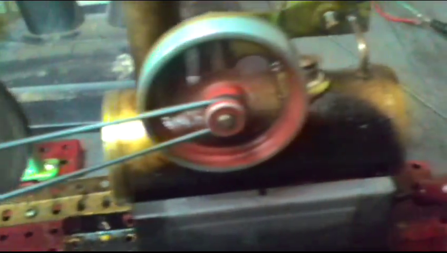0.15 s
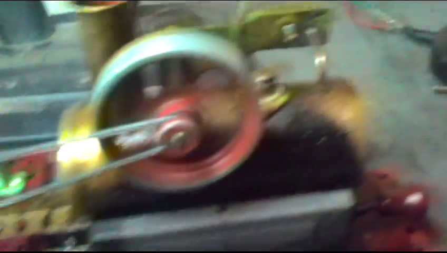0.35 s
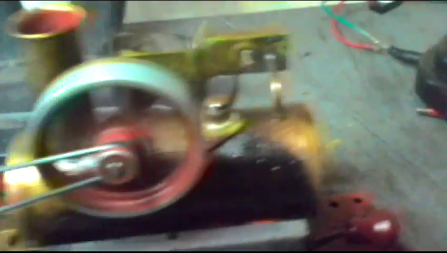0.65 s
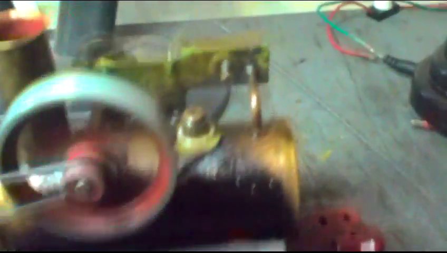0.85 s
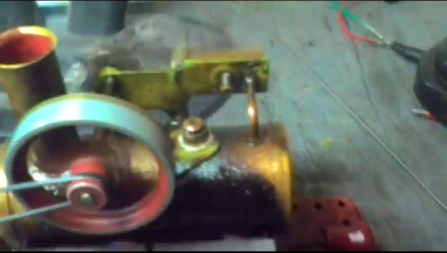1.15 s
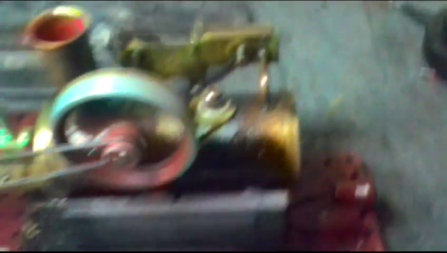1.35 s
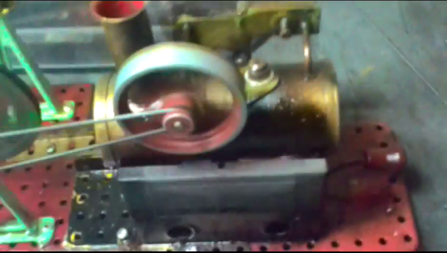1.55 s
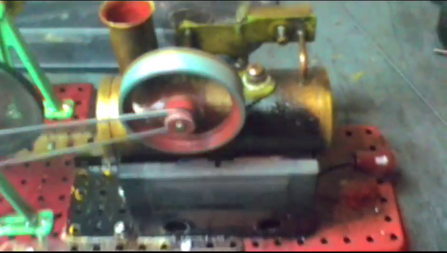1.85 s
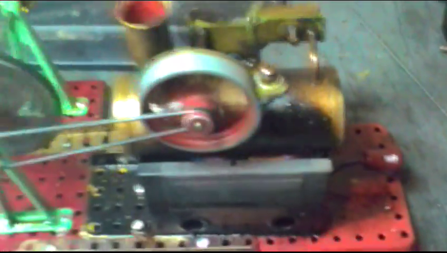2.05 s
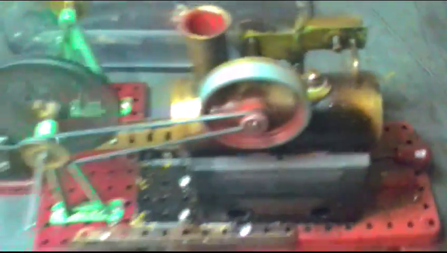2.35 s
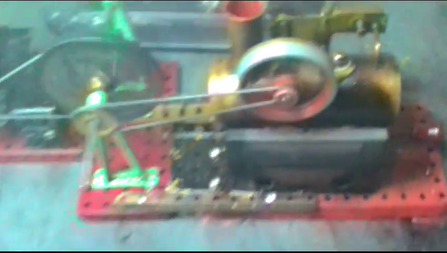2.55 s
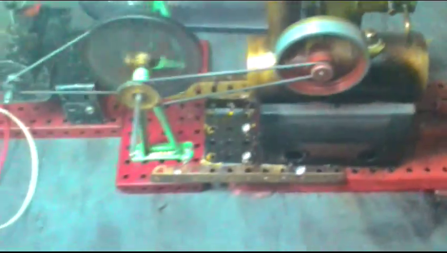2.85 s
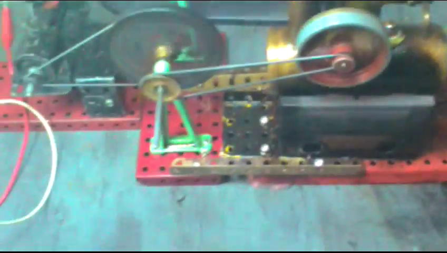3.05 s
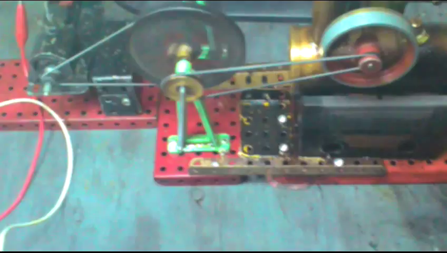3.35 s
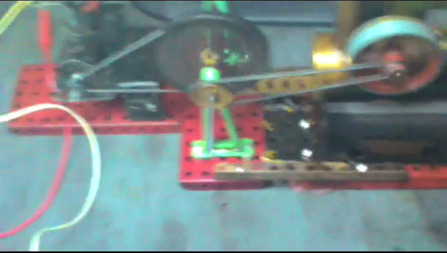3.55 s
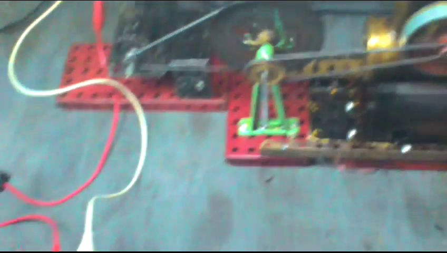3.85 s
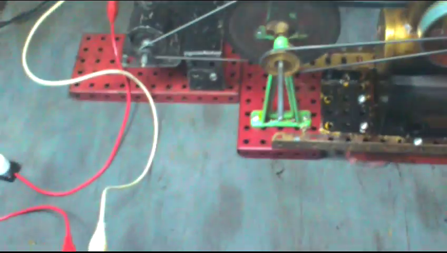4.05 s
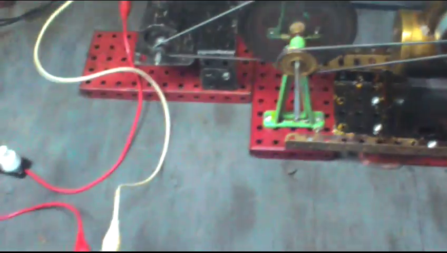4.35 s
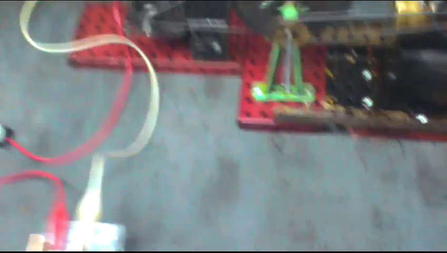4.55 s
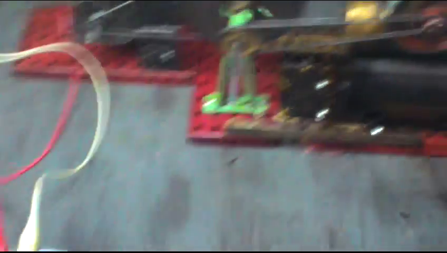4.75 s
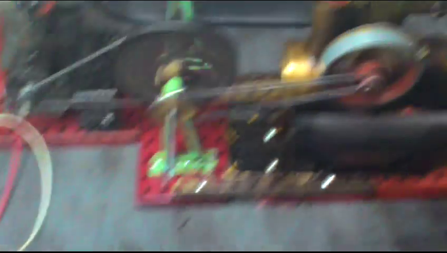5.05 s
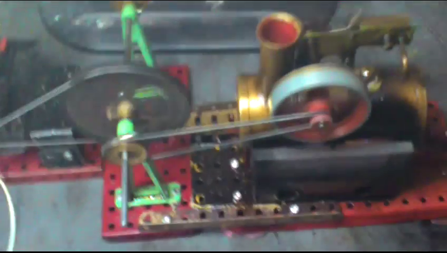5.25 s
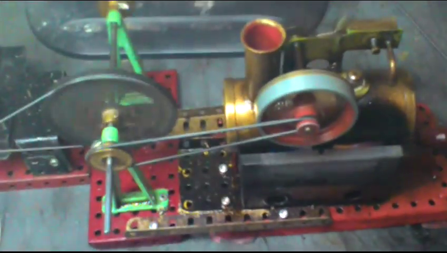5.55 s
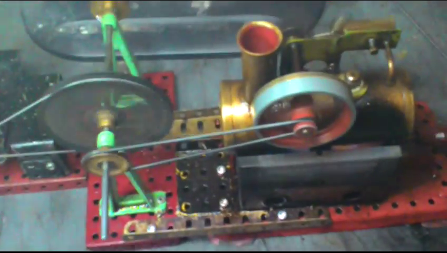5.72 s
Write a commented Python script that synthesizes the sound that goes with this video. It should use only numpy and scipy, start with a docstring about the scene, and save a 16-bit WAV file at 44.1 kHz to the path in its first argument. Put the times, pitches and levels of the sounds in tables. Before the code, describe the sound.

A small model steam engine runs for about six seconds at a steady speed, its loose crank knocking roughly 26 times a second. The knocks merge into a bright, ringing clatter of brass and steel over a low hum from the base plate, with soft belt and bearing rub between them. A thin, high valve spit is strongest in the first half second, and brief wet sputters of steam come between about 0.4 and 1.6 seconds. A loose metal strip rattles lightly around 1 second and again around 4.2 seconds. The clatter swells a little about every three quarters of a second as the load rises. The close microphone moves from the boiler and flywheel past the driven shaft, then farther back, shifting the ringing tones. The clatter eases from about 1.5 seconds and strengthens again after 5. Short echoes and faint workshop room noise sit behind it.

```python
"""A model steam engine runs on a bench, and its loose crank knocks once a turn, about 26 times a second.
Each knock makes the brass parts clatter and the steel frame ring, and its low thump keeps the base
plate humming. The valve spits and wet steam sputters. The engine is belted to a line shaft, and belts
and bearings rub between the knocks. The workshop murmurs and echoes behind it all as the microphone
moves from the boiler and flywheel to the shaft, over the base and farther back."""
import sys
import numpy as np
from scipy import signal
from scipy.fft import rfft, irfft, next_fast_len
from scipy.io import wavfile
from scipy.ndimage import uniform_filter1d

SR = 44100
rng = np.random.default_rng(int(sys.argv[2]) if len(sys.argv) > 2 else 0)


def to_wav(sig):
    """Store sig (one row per channel, or 1-D mono) as 16-bit WAV at the path in sys.argv[1].

    Samples outside -1..1 are clipped; the rate is SR.
    """
    pcm = np.clip(np.atleast_2d(sig), -1, 1) * 32767
    pcm = np.round(pcm).astype(np.int16)
    wavfile.write(sys.argv[1], SR, pcm.T)  # frames by channels


N = 259352
TIME = np.arange(N) / SR

# Microphone path: time_s, place (0 boiler, 1 flywheel, 2 line shaft, 3 over the base, 4 farther back)
MIC_PATH = [(0, 1), (.45, 0.5), (.95, 1), (1.25, 1), (1.8, 1.5), (2.25, 2), (3.0, 3.5), (4.6, 3), (5.3, 4),
            (5.88, 4)]
# Echo off the boiler casing: time_s, delay_s
BOILER_ECHO = [(0, 0.0026), (.55, 0.0017), (1.15, 0.002), (1.5, 0.0026), (1.9, 0.0013), (2.2, 0.0022),
               (2.6, 0.0019), (3.3, 0.0021), (3.95, .00317), (5.0, 0.0028), (5.4, 0.0023), (5.88, 0.0018)]
# Echo off the bench: delay_at_boiler_s, delay_farther_back_s, gain_db
BENCH_ECHO = (.0058, .0066, -13)

# Tone colour of the background, the wall echoes and the wet steam: pitch_hz, gain_db
MURMUR_COLOUR = [(20, -3), (45, 1.5), (100, -20), (300, -3), (700, 1.5), (1900, -1.5), (2500, -21),
                 (3300, 0), (8000, -41), (16000, -78)]
WALL_COLOUR = [(300, -35), (1200, -5.5), (2050, -2), (2450, -24.5), (2850, 4.5), (3700, -2.5), (4700, -1),
               (5400, -0.5), (5900, 7), (6900, -10.5), (7600, -8.5), (8700, -44), (16000, -69)]
SPUTTER_COLOUR = [(200, -60), (900, -16), (1950, -4), (2450, -4), (3100, -1.5), (3800, -7), (4500, 0),
                  (5200, -9), (6200, 2), (7800, -5.5), (9500, -24), (16000, -59)]
# Splashes of wet steam from the cylinder: middle_s, half_length_s, level_db
SPLASHES = [(0.42, 0.042, -48.5), (0.726, 0.015, -53), (1.196, 0.048, -53), (1.565, 0.038, -51)]
# Spells when a loose strip rattles: middle_s, length_s, delay_in_turn_s, pitch_hz, level_db
RATTLES = [(1.046, 0.63, 0.00292, 2040, -49.5), (4.212, 0.77, .0115, 1784, -54)]

# Loudness of each part as the microphone passes, before swells and surges: time_s, level_db
WALL_LEVEL = [(0, -51.5), (1.4, -54), (2.6, -47), (3.1, -52), (4.6, -49.5), (5.2, -44.5), (5.88, -45)]
VALVE_LEVEL = [(0, -48.5), (.4, -44), (1.198, -55), (2.098, -57), (3.197, -53), (4.5, -52.5),
               (4.997, -49.5), (5.88, -51.5)]
BASE_LEVEL = [(0, -45), (2.8, -46.5), (4.9, -44), (5.88, -44)]
FRAME_LEVEL = [(0.0, -44), (.45, -45.5), (1.15, -46), (1.4, -49.5), (2.2, -54), (3.18, -57.5), (4.08, -52),
               (4.6, -54.5), (5.0, -52), (5.45, -54), (5.88, -52)]
BRASS_LEVEL = [(0, -34.5), (.45, -34.5), (1.5, -40), (2.1, -39), (2.7, -39), (3.05, -40.5), (4.7, -41),
               (5.1, -36), (5.88, -34)]
# Swell of the base plate's upper tones as the microphone passes: time_s, gain_db
UPPER_HUM = [(0, -7), (2.3, 4.5), (2.75, -1), (3.1, -4), (3.5, -2), (4.2, 0.5), (4.95, 1.5), (5.3, 1.5),
             (5.88, 1)]

# The tones each part rings at (wider ones die sooner) and their relative strength at each place:
# pitch_hz, width_hz, boiler_db, flywheel_db, shaft_db, over_base_db
VALVE_TONES = [(7276, 192, 20.5, 7.5, 0, -0.5), (8080, 400, 11.5, 1, 4, -0.5),
               (8120, 730, -12, -3, 0, -3.5), (10150, 130, 0, -5, -6.5, -17.5),
               (10940, 420, -20, -21, -14, -15.5)]
BASE_TONES = [(92, 22, -19.5, -15.5, -12.5, -18.5), (160.6, 23.2, -10.5, -7.0, -3.5, -10),
              (181.5, 21.0, -15, -7, -4, -10), (236.73, 6.65, 5.5, 7.5, 9, 3.5),
              (285.6, 37.3, -12, -3.5, 0, -6), (332.8, 25.5, -3.5, -2.5, -2, -6),
              (429.0, 15.3, -4, -14.5, -14, -9.5), (462.7, 19.8, -3, -35, -20, -7.0),
              (529, 31.0, -1, -8, -16, -75), (639.3, 31, 7, -8.5, -11.5, -22),
              (676.6, 28.6, 3, -2.5, -18, -15)]
# The same columns, then farther_back_db
FRAME_TONES = [(806, 195, -1, -6, -5, -23.5, -10.5), (1044, 46, -11, -38, -44, -10.0, -8),
               (1409, 67, -6, -4.5, 1.5, -13.5, -8), (1447, 170, -6.5, -4.5, -3, -10.5, -23),
               (1661, 59, -15, 2.5, -7, -47, -10.5), (1745, 29, -6, -11, 2, -14, -21),
               (1835, 90, -4, 4.5, 1, -17, -14), (2067, 110, 1, 0.5, 5, -13, -3)]
BRASS_TONES = [(2980, 110, -23, -8, -40, -29, -11), (3534, 84, -3.5, -44, -31, -21.5, -10.5),
               (3967, 113, -24, -36, -11.5, -5.5, -7.5), (4200, 52, -27, -14, -3.5, -36.0, -8.5),
               (4306, 29, -20, -20, -9, -33, -28), (4564, 68, -2, -10, -13, -17.5, -5.0),
               (4695, 53, -15, -46, -8.5, -9.5, 0), (4904, 220, -36.0, -42, -8, -0.5, 4),
               (5100, 170, -43, -27, -4.5, -1.5, -1), (5565, 150, -8, -22, -36.0, -36.0, -12),
               (5833, 117, 0.0, 1.5, 2.5, -3.5, -7), (5920, 230, -14, -3.5, -7, -55, -30),
               (6360, 270, -7, 1.5, -10, -23, -7), (6660, 170, 3, -36.0, -44, -50, -10)]
# Single tones that shift as the microphone passes: time_s, pitch_hz, level_db
LOW_PLATE_RING = [(0, 660, -57), (.5, 642, -54.5), (1.0, 654, -56), (1.6, 660, -59), (2.299, 657, -64),
                  (4.6, 667, -69.5), (5.2, 660, -63), (5.88, 675, -62)]
STRIP_RING = [(0, 1080, -65.5), (.5, 1093, -58.5), (0.849, 1104, -54.5), (1.5, 1112, -58.5),
              (2.0, 1142, -56), (2.6, 1136, -57.5), (3.002, 1110, -60), (5.88, 1240, -66)]
BRACKET_RING = [(0, 1160, -67), (1.7, 1230, -66), (2.6, 1196, -59), (3.05, 1233, -62.5), (3.45, 1200, -54),
                (3.75, 1235, -60.5), (4.15, 1237, -50), (4.6, 1240, -56.5), (4.95, 1207, -48),
                (5.3, 1265, -55), (5.7, 1257, -52), (5.88, 1230, -51)]
LOW_BRASS_RING = [(0, 3020, -39.5), (.55, 3080, -47.5), (0.799, 3335, -46), (1.2, 3490, -51.5),
                  (1.55, 3390, -55.5), (2.1, 3480, -47), (2.35, 2970, -63), (2.6, 2960, -47),
                  (2.85, 2900, -54.5), (3.1, 2720, -82), (4.7, 3086, -54), (5.05, 2981, -48),
                  (5.88, 2940, -52)]

# Short bursts of force within one turn: delay_s, gain_db, decay_s, scatter_db
VALVE_TICKS = [(.0018, 10.2, 0.0053, 0.98), (0.0174, 5.1, 0.0031, 5.2)]
FRAME_JOLTS = [(0.002, 7.5, 0.0022, 0.41), (.0055, 2.5, 0.0021, 1.4), (0.0098, 8.5, 0.00086, 1.1),
               (0.023, 3, 0.0016, 2.3), (0.035, -5.5, 0.0021, 2.2)]
CRANK_CHATTER = [(.0016, -1, .0008, 4.5), (.0033, -3.5, 0.00086, 4), (.0065, -17, 0.0014, 2.5),
                 (0.0100, -8.5, 0.0008, 3), (0.0196, -18.5, 0.002, -1.5)]
# Engine speed, kept nearly even by the flywheel: time_s, turns_per_s
SPEED = [(0, 26.68), (1.3, 26.51), (4.7, 26.53), (5.88, 26.75)]
# The load rises about once per turn of the big driven wheel: start_s, boost_db
LOAD_SURGES = [(0.31, 1.5), (1.091, 3), (1.801, 5), (2.53, 2), (3.32, 6), (3.999, 6.5), (4.78, 6),
               (5.581, 1)]
# Single knocks that land harder or softer than their neighbours: time_s, gain_db
ODD_KNOCKS = [(1.656, 3.5), (2.033, -0.5), (2.146, 2.5), (2.183, -3.5), (2.712, 1.5), (2.976, -2.5),
              (3.089, 0.5), (3.239, 2.5), (3.353, 3.5), (3.843, -2.5), (3.956, -2.0), (3.993, -1),
              (4.144, -3.5), (4.22, 2.5), (4.37, 0.5), (4.521, -3.0), (4.559, 2), (4.597, 3), (4.672, -2),
              (4.71, -2), (4.747, -1.5), (4.785, 3.5)]
# Hard rebounds of the crank pin: time_s, gain_db (added to rebound_db)
REBOUNDS = [(0.384, -5.5), (0.4215, -8), (0.574, -11), (1.135, -10), (1.816, -7.5), (1.9305, -14),
            (2.12, -29)]


def from_db(db):
    """Turns decibels into a number to multiply by."""
    return 10 ** (np.asarray(db) / 20)


def in_time(rows):
    """Joins a table's points with straight lines, giving each column a value at every sample."""
    time_s, *columns = np.transpose(rows)
    return [np.interp(TIME, time_s, column) for column in columns]


def keep_band(x, hz, kind, order=2):
    """Keeps the "low" or the "high" side of hz; a higher order cuts more steeply."""
    return signal.sosfilt(signal.butter(order, hz, kind, fs=SR, output="sos"), x)


def at_level(x, db, block=128, span=39):
    """Brings the level, averaged over a few turns, to db."""
    power = np.add.reduceat(x * x, np.arange(0, N, block)) / block
    power = uniform_filter1d(uniform_filter1d(power, span), span)
    return from_db(db) * x * np.repeat((np.abs(power) + 1e-20) ** -.5, block)[:N]


def coloured(x, colour):
    """Turns each frequency up or down to follow a tone colour table."""
    hz, db = np.transpose(colour)
    size = next_fast_len(N)
    bins_hz = np.maximum(np.fft.rfftfreq(size, 1 / SR), 1)
    gain = from_db(np.interp(np.log(bins_hz), np.log(hz), db))
    return irfft(rfft(x, size) * gain, size)[..., :N]


def clicks(times, gains):
    """Clean, hard blows, one sample long."""
    out = np.zeros(N)
    out[np.clip(np.asarray(times) * SR, 0, N - 1).astype(int)] = gains
    return out


def contacts(starts, table, rub_db, alike, rise_s=0.00041):
    """Noisy bursts over steady rubbing. The same surfaces meet each turn, so the share `alike` repeats."""
    size = int(.04 * SR)
    age = np.arange(size) / SR
    power = np.full((len(starts), size), from_db(rub_db) ** 2)
    for delay, db, decay, scatter_db in table:
        force = from_db(db + scatter_db * rng.standard_normal((len(starts), 1)))
        burst = np.exp(-np.abs(age - delay) / np.where(age < delay, rise_s, decay))
        power += (force * burst) ** 2
    shape, usual_shape = np.sqrt(power), np.sqrt(power.mean(0))
    grain = rng.standard_normal(size)
    for _ in range(8):   # a hard contact holds all frequencies evenly
        spectrum = rfft(grain * usual_shape)
        grain = irfft(spectrum / np.abs(spectrum), size) / usual_shape
        grain = np.clip(grain / grain.std(), -3, 3)
    blows = shape * (np.sqrt(alike) * grain + np.sqrt(1 - alike) * rng.standard_normal(shape.shape))
    out = np.zeros(N + 2 * size)
    for start, blow in zip(np.clip(starts * SR, 0, N).astype(int), blows):
        out[start:start + size] += blow
    return out[:N]


def resonate(force, tones):
    """A part rings at steady pitches, each as strong as it is at the microphone's place."""
    place, = in_time(MIC_PATH)
    out = np.zeros(N)
    for k, (hz, width, *dbs) in enumerate(tones):
        gain = np.interp(place, np.arange(len(dbs)), from_db(dbs))
        out += (-1) ** k * gain * signal.lfilter(*signal.iirpeak(hz, hz / width, fs=SR), force)
    return out


def ring(force, hz, width_hz, edge_ratio=2.49):
    """One gliding tone: shift the force down by hz, smooth it, and shift it back up."""
    angle = 2 * np.pi * np.cumsum(hz) / SR
    waves = np.array([np.cos(angle), np.sin(angle)])
    core, edge = np.exp(-np.pi * width_hz / SR), np.exp(-np.pi * edge_ratio * width_hz / SR)
    slow = signal.lfilter([(1 - core) * (1 - edge)], [1, -core - edge, core * edge], force * waves)
    return slow[0] * waves[0] + slow[1] * waves[1]


def struck(force, tones, waver_db=2.1, pitch_waver=0.0055):
    """A struck part's tones waver a little and change in strength with the microphone's place."""
    moments = np.arange(0, TIME[-1] + 1, .12)
    place = np.interp(moments, *np.transpose(MIC_PATH))
    out = np.zeros(N)
    for k, (hz, width, *dbs) in enumerate(tones):
        louder, higher = rng.standard_normal((2, len(moments)))
        gain = np.interp(place, np.arange(len(dbs)), from_db(dbs)) * from_db(waver_db * louder)
        pitch_hz = np.interp(TIME, moments, hz * (1 + pitch_waver * higher))
        out += (-1) ** k * np.interp(TIME, moments, gain) * at_level(ring(force, pitch_hz, width), 0)
    return out


def single_tone(force, curve, width_hz):
    """A single tone whose pitch and level shift as the microphone passes."""
    hz, db = in_time(curve)
    return at_level(ring(force, hz, width_hz), db)


def murmur(level_db=-59.5, side_db=-17):
    """The steady background of the workshop, nearly alike on both sides."""
    middle, side = coloured(rng.standard_normal((2, N)), MURMUR_COLOUR)
    return from_db(level_db) * (middle + from_db(side_db) * side * [[1], [-1]]) / middle.std()


def wall_echoes(force, surge_db, first_wall_s=0.0061, fade_s=0.14, surge_share=0.12):
    """The walls return the clatter and fill the gaps between the knocks."""
    age = np.arange(SR // 2) / SR
    tail = rng.standard_normal(len(age)) * from_db(-60 * age / fade_s) * (age > first_wall_s)
    echoes = coloured(signal.fftconvolve(force, tail)[:N], WALL_COLOUR)
    return at_level(echoes, in_time(WALL_LEVEL)[0] + surge_share * surge_db)


def room_scatter(x, fade_s=0.0054, gain_db=-10.5):
    """The room scatters the treble into a very short tail, different at each ear."""
    age = np.arange(SR // 3) / SR
    tail = rng.standard_normal((2, len(age))) * from_db(-60 * age / fade_s) * (age > .004)
    tail /= np.sqrt(np.sum(tail ** 2, axis=1, keepdims=True))
    return from_db(gain_db) * signal.fftconvolve(keep_band(x, 1770, "high")[None], tail, axes=1)[:, :N]


def with_near_echoes(x, boiler_db=-12):
    """Echoes off the boiler and bench colour the sound; their delays glide as the microphone moves."""
    place, = in_time(MIC_PATH)
    boiler_s, = in_time(BOILER_ECHO)
    near_s, far_s, bench_db = BENCH_ECHO
    bench_s = near_s + (far_s - near_s) * place / place.max()
    boiler, bench = (np.interp(TIME - delay, TIME, x, left=0) for delay in (boiler_s, bench_s))
    return x - from_db(boiler_db) * boiler + from_db(bench_db) * bench


def sputter(steady_db=-53, drops_per_s=860, size_spread_db=5.0):
    """Droplets burst in the leaking steam all the time, and in short splashes when water gathers."""
    drops = (rng.random(N) < drops_per_s / SR) * rng.choice([-1, 1], N)
    sizes = from_db(size_spread_db * np.minimum(rng.exponential(1, N), 4))
    spray = coloured(drops * sizes, SPUTTER_COLOUR)
    splashes = sum(from_db(db) * np.exp(-((TIME - s) / half_s) ** 2) for s, half_s, db in SPLASHES)
    return (from_db(steady_db) + splashes) * spray / spray.std()


def loose_strips(starts, width_hz=220, contact_s=0.0005, scatter_db=2):
    """For a while a strip shakes free and is tapped at the same point of every turn."""
    out = np.zeros(N)
    for middle, length, delay, hz, db in RATTLES:
        taps = contacts(starts + delay, [(0.00085, 0, contact_s, scatter_db)], rub_db=-24, alike=0.63)
        for _ in range(2):
            taps = signal.lfilter(*signal.iirpeak(hz, hz / width_hz, fs=SR), taps)
        fade = np.cos(np.pi * np.clip((TIME - middle) / length, -.5, .5))
        out += at_level(taps, db) * fade
    return out


def valve(starts):
    """A thin spit swells and fades at each end of the piston's stroke."""
    ticks = contacts(starts, VALVE_TICKS, rub_db=-21.5, alike=0.14, rise_s=0.0026)
    spit = keep_band(resonate(ticks, VALVE_TONES), 6800, "high", order=4)
    return at_level(keep_band(spit, 12150, "low", order=4), in_time(VALVE_LEVEL)[0])


def wheel_drag(turns_per_s=1.301, peak_s=4.938):
    """The drag of the big driven wheel swings between -1 and 1 as it turns."""
    return np.cos(2 * np.pi * turns_per_s * (TIME - peak_s))


def base_plate(starts, filter_delay_s=0.002607, roughness=0.17, upper_hz=385, swell_db=3.0):
    """A low thump with each knock keeps the plate humming."""
    thumps = clicks(starts - filter_delay_s, from_db(rng.normal(0, 0.2, len(starts))))
    thumps += roughness * thumps.std() * rng.standard_normal(N)
    hum = keep_band(resonate(thumps, BASE_TONES), 49, "high")
    hum = keep_band(hum, 790, "low", order=3)
    upper = hum
    for _ in range(2):   # filtering forwards, then backwards keeps the upper tones in step with the hum
        upper = keep_band(upper, upper_hz, "high", order=8)[::-1]
    swell = from_db(swell_db * wheel_drag() + in_time(UPPER_HUM)[0])
    return at_level(hum + (swell - 1) * upper, in_time(BASE_LEVEL)[0])


def steel_frame(starts, jolt_db=25, jolt_delay_s=0.001494, swell_db=0.04):
    """Steel strips, a bracket and a low plate tone ring as the crank jolts and shafts and belts rub."""
    jolts = clicks(starts + jolt_delay_s, from_db(jolt_db))
    force = with_near_echoes(jolts + contacts(starts, FRAME_JOLTS, rub_db=-17.5, alike=0.74))
    strips = keep_band(struck(force, FRAME_TONES), 2060, "low", order=8)
    level_db = in_time(FRAME_LEVEL)[0] + swell_db * wheel_drag()
    return (at_level(keep_band(strips, 535, "high"), level_db)
            + single_tone(force, STRIP_RING, width_hz=47)
            + single_tone(force, BRACKET_RING, width_hz=43)
            + single_tone(force, LOW_PLATE_RING, width_hz=71))


def load_surges(rise_s=0.061, ease_s=0.18):
    """Extra force of the knock in dB: each surge of load comes quickly and eases off."""
    out = np.zeros(N)
    for start, db in LOAD_SURGES:
        age = np.maximum(TIME - start, 0)
        out += db * np.minimum(age / rise_s, 1) * np.exp(-np.maximum(age - rise_s, 0) / ease_s)
    return out


def brass_clatter(force, surge_db):
    """The brass cylinder and boiler ring briefly under the blows of the crank."""
    odd_db = sum(db * ((TIME > s - .003) & (TIME < s + .022)) for s, db in ODD_KNOCKS)
    level_db = in_time(BRASS_LEVEL)[0] + surge_db + odd_db
    clatter = keep_band(struck(with_near_echoes(force), BRASS_TONES), 2720, "high", order=6)
    return at_level(clatter, level_db) + single_tone(force, LOW_BRASS_RING, width_hz=91)


def turn_starts(jitter_s=.00002):
    """The moment at which each turn of the crank begins."""
    turns = np.cumsum(in_time(SPEED)[0]) / SR
    count = int(turns[-1]) + 1
    return np.interp(np.arange(count), turns, TIME) + rng.normal(0, jitter_s, count)


def crank(starts, blow_db=19, scatter_db=1.5, delay_s=0.00021, rebound_db=26):
    """The loose crank pin crosses its gap, strikes, chatters and now and then rebounds hard."""
    blows = clicks(starts + delay_s, from_db(blow_db + scatter_db * rng.standard_normal(len(starts))))
    chatter = contacts(starts, CRANK_CHATTER, rub_db=-26, alike=0.71, rise_s=.0007)
    time_s, gain_db = np.transpose(REBOUNDS)
    return blows + chatter + clicks(time_s, from_db(rebound_db + gain_db))


def scene(left_lag_s=.000017, side_spit_db=-8):
    """One crank sets the beat for every part; the clatter reaches the left side just after the right."""
    starts, surge_db = turn_starts(), load_surges()
    blows = crank(starts)
    metal = steel_frame(starts) + brass_clatter(blows, surge_db) + loose_strips(starts) + valve(starts)
    right = metal + wall_echoes(blows, surge_db) + sputter()
    size = next_fast_len(N)
    lag = np.exp(-2j * np.pi * np.fft.rfftfreq(size, 1 / SR) * left_lag_s)   # less than one sample
    left = irfft(rfft(right, size) * lag, size)[:N]
    # part of the spit differs between the ears, so it sounds wide
    side_spit = from_db(side_spit_db) * valve(starts) * [[1], [-1]]
    return np.array([left, right]) + base_plate(starts) + room_scatter(metal) + side_spit + murmur()


def record(dry, cutoff_hz=15900):
    """The highest treble is cut off steeply."""
    return signal.sosfilt(signal.ellip(10, .1, 80, cutoff_hz, fs=SR, output="sos"), dry)


dry = scene()
out = record(dry)
to_wav(out)
```